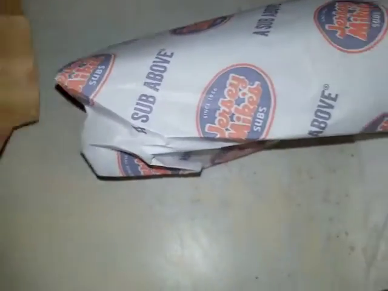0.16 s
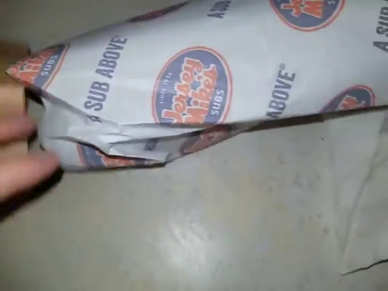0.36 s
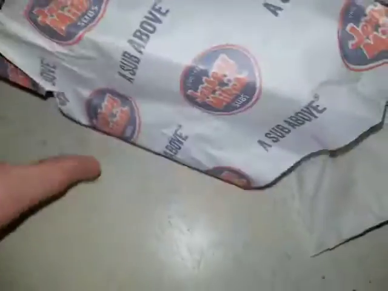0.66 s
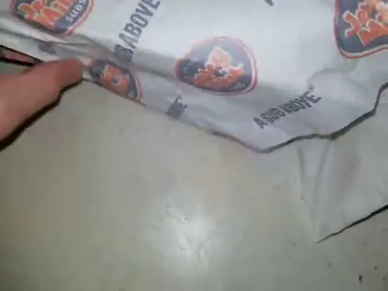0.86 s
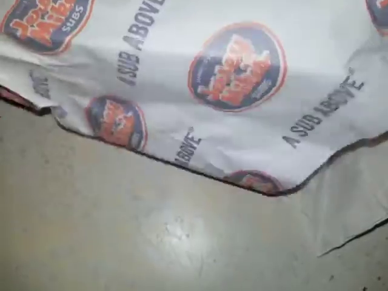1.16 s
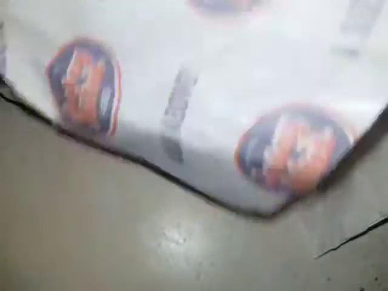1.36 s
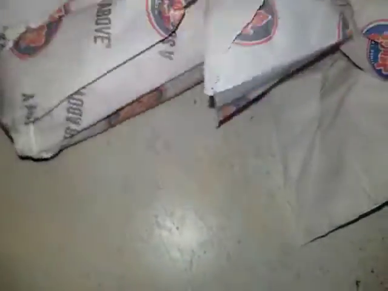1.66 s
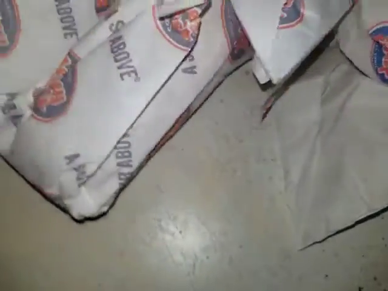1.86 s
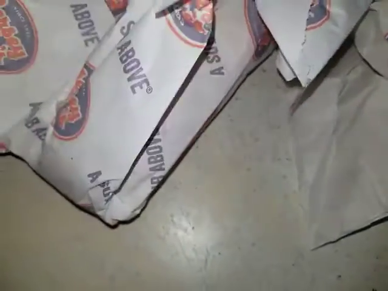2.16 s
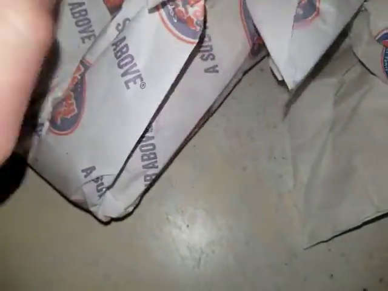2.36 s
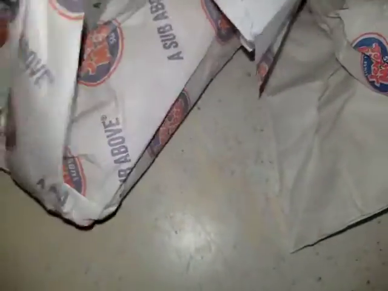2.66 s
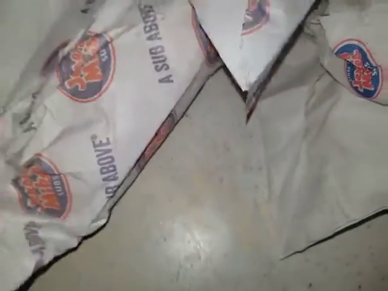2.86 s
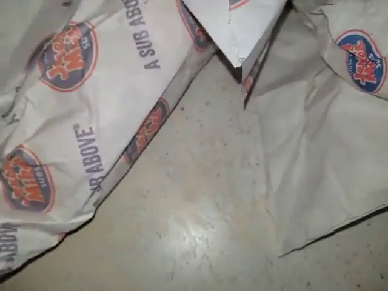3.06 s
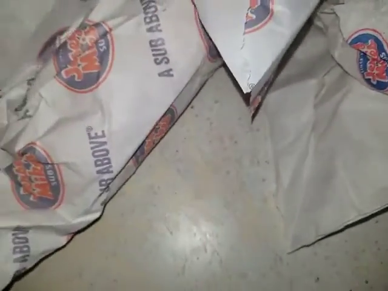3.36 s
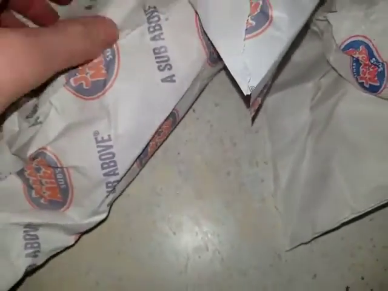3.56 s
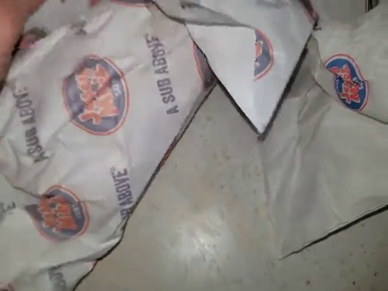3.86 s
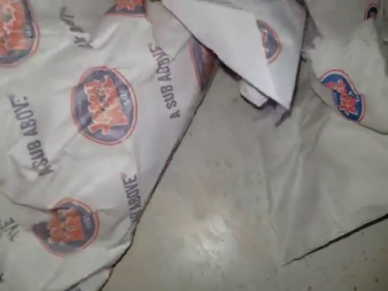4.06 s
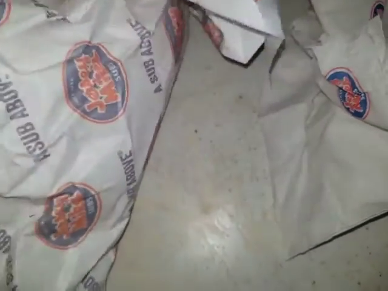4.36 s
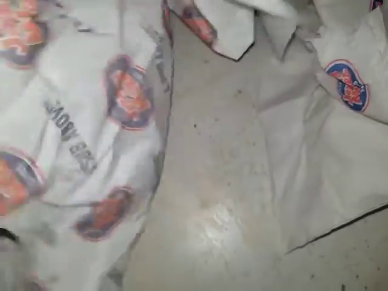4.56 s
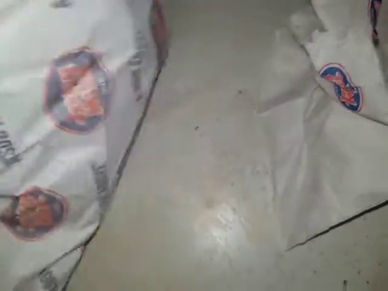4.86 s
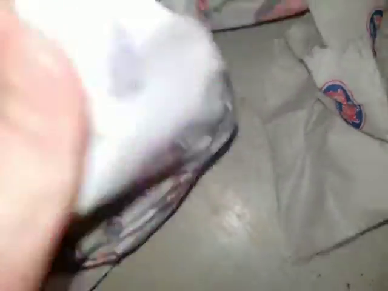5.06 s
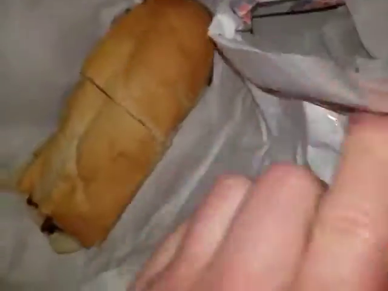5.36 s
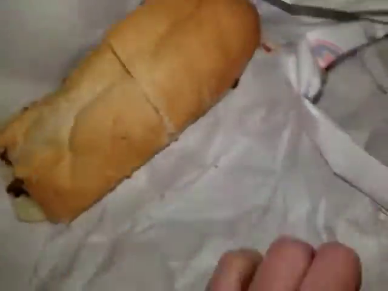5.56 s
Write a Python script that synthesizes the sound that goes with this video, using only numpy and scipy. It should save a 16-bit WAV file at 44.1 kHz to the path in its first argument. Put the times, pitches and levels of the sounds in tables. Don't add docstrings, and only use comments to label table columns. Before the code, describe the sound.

Stiff wrapping paper crinkles continuously but unevenly. It begins with separate rustles and strong snaps, thickens into rapid bright ticking and rasping swells, then opens with longer slides and calms before one last crackle. Dull table pushes and hollow paper knocks come between. Very close, wide stereo, little echo, with treble briefly dulling beside peaks, like a small handheld recorder.

```python
import sys
import numpy as np
from scipy import signal
from scipy.fft import rfft, irfft
from scipy.io import wavfile
from scipy.ndimage import minimum_filter1d

SR = 44100
rng = np.random.default_rng(int(sys.argv[2]) if len(sys.argv) > 2 else 0)


def store_wav(level_fs):
    pcm = np.round(np.clip(np.atleast_2d(level_fs), -1, 1) * 32767)
    wavfile.write(sys.argv[1], SR, pcm.T.astype(np.int16))


def gain_from_decibels(decibels):
    exponent = np.asarray(decibels, float) / 20
    return 10 ** exponent


N = 251811

BANDS_HZ = 32 * 2 ** np.arange(0, 9.1, .5)
CENTRES_HZ = np.sqrt(BANDS_HZ[1:] * BANDS_HZ[:-1])[:, None]
STEP = 8
T = np.arange(N // STEP + 1) * STEP / SR
SECONDS = np.arange(N) / SR
BOOM_DB = 10

# (time [s], level change [dB])
DIPS = [(.762, 1), (1.233, -22), (1.343, -10), (1.422, 4), (1.576, -5), (1.837, -3), (1.892, -17),
        (1.949, -6), (2.021, -24), (2.205, -11), (2.46, -19), (2.628, -3), (2.739, -5), (2.834, -13),
        (2.9, -6), (2.918, -7), (2.956, -10), (3.047, -30), (3.068, -56), (3.391, -14), (3.411, -9),
        (3.689, 6), (3.753, -14), (3.838, -14), (3.868, -12), (3.9, -4), (3.934, 4), (4.329, -24),
        (4.518, -34), (4.571, -7), (4.902, -13), (5.154, -7), (5.287, -9), (5.443, -12), (5.648, -10),
        (5.668, -23)]


def at_hz(points, hz):
    point_hz, value = np.transpose(points)
    return np.interp(np.log(hz), np.log(point_hz), value)


def below(corner_hz):
    return 1 / (1 + (CENTRES_HZ / corner_hz) ** 4)


def band(k, x):
    sos = signal.butter(2, BANDS_HZ[k:k + 2], "band", fs=SR, output="sos")
    return signal.sosfilt(sos, x)


def around(s, before, after):
    middle = round(s * SR / STEP)
    near = slice(max(middle - before, 0), middle + after)
    return near, 1000 * (T[near] - s)


def drift(rate_hz):
    r = np.exp(-2 * np.pi * rate_hz * STEP / SR)
    white = rng.standard_normal(len(T) + 4000)
    slow = signal.lfilter([1], [1, -2 * r, r * r], white)[4000:]
    return slow / slow.std()


def slips(gain_db, scatter_db):
    # (time [s], level [dB])
    effort = [(0, -49), (.27, -54.5), (.48, -35), (.76, -56), (.96, -37.5), (1.11, -52.5), (1.3, -42),
              (1.9, -46.5), (2.56, -50), (3.1, -40), (3.53, -56.5), (3.84, -46), (4.06, -40.5), (4.32, -47),
              (4.64, -39), (4.96, -41), (5.1, -49.5), (5.44, -52.5)]
    # (time [s], peak [dB], rise [ms], fall [ms], boom [dB])
    roll_out = [(.024, -29, 7.8, 12.3, -4.5), (.052, -38, 5.1, 21, 0), (.115, -31, 2.5, 6.4, -4.5),
                (.329, -29, 2.7, 8.3, -11), (.367, -44, 5.3, 97, 2), (.45, -29, 23.5, 5.9, -5.5),
                (.65, -43, 150, 6.2, -23), (.745, -45, 28, 39, -22.5), (.774, -32.5, 7.8, 6.6, -12),
                (.88, -33, 0.98, 7.1, -15), (.902, -31, 3.1, 16, -14), (1.011, -36, 26, 12, -20),
                (1.179, -37.5, 24.5, 40, -10.5), (1.247, -32.5, 3.9, 16, -8), (1.337, -28, 6.8, 7.1, -7.5),
                (1.362, -36, 4.9, 14, -8), (1.415, -31, 5.7, 2.9, -10), (1.447, -23.5, 3.3, 3.4, -15.5),
                (1.556, -67, 3.8, 4.1, -28), (1.5955, -27, 1.8, 2.6, -27.5), (1.685, -35, 56, 33, -9.5)]
    pick_at_fold = [(1.796, -23.5, 14, 3.7, -10.5), (1.84, -27, 6.6, 2.1, -14),
                    (1.959, -31.5, 10.6, 10.4, -14), (2.031, -29.5, 27.5, 7.5, -12),
                    (2.118, -33.5, 47, 11, -6.5), (2.16, -29.5, 9.3, 4.7, -12.5),
                    (2.211, -32.5, 5.1, 2.6, -13), (2.249, -40.5, 17, 12.5, -1), (2.321, -33, 17, 18, -14),
                    (2.365, -31.5, 12, 8.8, -14), (2.398, -35.5, 5.5, 6.4, -9),
                    (2.495, -23.5, 11.8, 4.1, -12.5), (2.653, -28.5, 10, 9.1, -14.5),
                    (2.704, -32.5, 19, 24, -12), (2.801, -28.5, 10, 11.2, -16),
                    (2.847, -34, 4.5, 3.5, -8.5), (3, -36, 9.3, 44, -5), (3.092, -25, 2.4, 2.8, -20.5),
                    (3.196, -29.5, 11.5, 9.3, -12), (3.242, -35.5, 14, 5.3, -15),
                    (3.316, -32, 2.6, 6.9, -13), (3.399, -35, 25, 11, -11.5),
                    (3.424, -32.5, 7.3, 7.1, -12.5), (3.44, -41.5, 3.7, 26, -8.5)]
    pull_open = [(3.575, -43, 9, 17, -4.5), (3.614, -34, 3.2, 3.8, -7), (3.64, -39.5, 12, 17, -11.5),
                 (3.778, -29.5, 12, 7.1, -11.5), (3.852, -38.5, 19, 2.9, -10.5),
                 (3.914, -30, 3.4, 8.3, -10.5), (4.053, -53, 16, 3.4, 6), (4.207, -31.5, 5.9, 3.1, -4.5),
                 (4.345, -38, 6.7, 63, -13.5), (4.445, -29.5, 5, 1.1, -9), (4.529, -29.5, 13.5, 25, -13.5),
                 (4.659, -27, 12, 26, -14), (4.788, -26, 10.3, 20, -16), (4.919, -32, 5.6, 9.5, -15),
                 (5.015, -39.5, 6.4, 19, -15), (5.409, -46.5, 6, 3, -12), (5.63, -41, 35, 120, -12.5),
                 (5.466, -47, 3.3, 5, -4), (5.561, -37.5, 42, 17, -9), (5.658, -30, 7.7, 7.5, -14)]
    low, top = below(1250.0), 1 - below(5000.0)

    s, effort_db = np.transpose(effort)
    rustle_db = np.interp(T, s, effort_db)
    rustle_boom_db = rustle_db + 45.0 - 53.5
    gentle_db = 0.082 * (rustle_db + 49.5)
    power = gain_from_decibels(low * (rustle_boom_db + BOOM_DB) + (1 - low) * rustle_db + top * gentle_db) ** 2

    rows = roll_out + pick_at_fold + pull_open
    chance = rng.standard_normal((len(rows), len(low), 1))
    for (s, db, rise_ms, fall_ms, boom_db), luck in zip(rows, chance):
        near, ms = around(s, 400, 400)
        bright_db = -2.5 - 0.81 * (boom_db + 12.5)
        colour_db = low * (boom_db + BOOM_DB) + top * bright_db
        reach = np.where(ms < 0, (ms / rise_ms) ** 4, (ms / fall_ms) ** 2)
        power[:, near] += gain_from_decibels(db + gain_db + colour_db + scatter_db * luck) ** 2 * np.exp(-.5 * reach)
    return power


def grain(per_s, size_db, clump_db, grain_ms, smooth, spread_octaves):
    clumps = gain_from_decibels(clump_db * drift(36.0))
    born = rng.random(len(T)) < per_s * clumps * STEP / SR
    size = born * gain_from_decibels(2 * size_db * np.minimum(rng.exponential(1, len(T)), 3.))
    pitch = rng.uniform(7.41, 17.81, len(T))
    distance = (np.log2(CENTRES_HZ) - pitch) / spread_octaves
    kicks = size * (0.082 + np.exp(-distance ** 2))
    fade = np.exp(-1000 * STEP / (grain_ms * SR))
    grains = signal.lfilter([1], [1, -fade], kicks)
    grains = grains / grains.mean(axis=1)[:, None]
    return (1 - smooth) * grains + smooth * clumps / clumps.mean()


def creases():
    # (time [s], peak [dB], brightest pitch [Hz], boom [dB])
    roll_out = [(0.1122, -19, 2220, -10), (.3311, -15.5, 7100, -55), (0.3606, -20, 3550, -32),
                (.4635, -15.5, 5860, -46), (.49, -44, 5000, -25.5), (.533, -32, 1550, 4),
                (.5719, -24.5, 924, -5), (.625, -40, 1080, 7.5), (0.6526, -22, 7000, -23),
                (0.7678, -7.5, 4630, -24), (0.8779, -32.5, 5450, 10.5), (.8978, -21, 1460, -8),
                (1.186, -28, 2880, -37), (1.2433, -10, 2290, -20), (1.2952, -16, 4830, -8),
                (1.3187, -10.5, 2800, -25), (1.3322, -21, 6600, -14), (1.3372, -18, 2750, -11),
                (1.3602, -13, 4100, -34), (1.3649, -18, 7300, -33), (1.3965, -23, 4050, -31),
                (1.4114, -12.5, 3920, -22), (1.4265, -22, 3650, -30), (1.4482, -10.5, 6400, -37),
                (1.518, -26, 4200, -10.5), (1.5511, -13.5, 2930, -18), (1.5595, -33, 4130, -36),
                (1.5955, -16.5, 5060, -22), (1.729, -25, 3140, -8)]
    pick_loose = [(1.7981, -8.5, 7500, -30), (1.8458, -12.5, 7950, -42), (1.866, -21.5, 6500, -9.5),
                  (1.908, -18.5, 2900, -39), (1.955, -18, 6000, -37), (1.963, -9.5, 6060, -45),
                  (2.011, -36.5, 2800, 5), (2.0345, -12, 6550, -46), (2.0496, -18, 7060, -18),
                  (2.1543, -17, 6800, -19), (2.471, -18, 6060, -29), (2.491, -8, 6440, -15),
                  (2.7496, -14.5, 7300, -10), (2.78, -23, 7150, -22), (2.8006, -35, 4400, -14),
                  (2.8516, -17, 7100, -30), (2.877, -23.5, 6980, -48), (2.908, -23.5, 2510, -11.5),
                  (2.9464, -16.5, 7600, -14), (2.964, -20.5, 5850, -11), (3.0035, -18, 4760, -25),
                  (3.06, -15.5, 8500, -8.5), (3.074, -20, 5350, -26), (3.0908, -22, 5430, -35),
                  (3.1881, -16.5, 7490, -23), (3.1998, -18, 4700, -32), (3.2352, -17, 1390, -13.5),
                  (3.245, -18, 7000, -14), (3.306, -25, 4050, -5), (3.4014, -27, 2020, -32),
                  (3.4193, -21, 3340, -25)]
    pull_open = [(3.698, -20, 7000, -40), (3.7038, -13, 7800, -48), (3.758, -34, 4390, -15),
                 (3.774, -20.5, 2300, -28), (3.854, -16.5, 6900, -19), (3.919, -16, 7000, -40),
                 (4.0216, -18, 1555, -29), (4.036, -18, 4500, -10), (4.053, -23, 4570, -28),
                 (4.157, -21, 5640, -44), (4.171, -27, 6200, -20), (4.21, -26, 7000, -19),
                 (4.258, -28.5, 6340, -13), (4.447, -25, 6600, -35), (4.4752, -21.5, 7150, -41),
                 (4.5218, -13, 2710, -21), (4.5838, -15, 6700, -30), (4.63, -17.5, 6800, -12),
                 (4.6657, -15.5, 5270, -17), (4.673, -21, 4760, -12), (4.783, -25, 8100, -14),
                 (4.9122, -19.5, 7400, -30), (4.974, -12, 4930, -18), (5.162, -31, 2460, -34),
                 (5.298, -21, 6160, -15), (5.458, -31.5, 6400, -10.5), (5.4657, -27, 4600, -19),
                 (5.5798, -22, 3220, -21), (5.6596, -29, 7400, -41), (5.689, -17.5, 5170, -15.5)]
    # (time [s], peak [dB], brightest pitch [Hz], boom [dB])
    small_ticks = [(0.0174, -23, 2080, -4), (0.3273, -11, 2020, -23), (0.422, -18, 2400, -20),
                   (0.447, -18, 1970, -20), (0.4535, -11.5, 7010, -24), (0.7751, -19.5, 2480, -4.5),
                   (0.9043, -14, 2840, -28), (0.966, -25, 4030, -28), (0.9876, -15, 6610, -29),
                   (1.0048, -20, 2300, 2), (1.157, -40, 2230, -20), (1.204, -27, 3040, -20),
                   (1.228, -16, 2070, -25), (1.6802, -16.5, 2290, -9), (1.7897, -15, 6600, -24),
                   (1.831, -23, 2660, -4.5), (2.0852, -22, 2450, -20), (2.0954, -13.5, 2980, -17),
                   (2.1146, -18, 1630, -14), (2.213, -25, 3150, -11), (2.2358, -37, 1340, -20),
                   (2.26, -27, 1930, -19), (2.297, -29, 2930, -14), (2.3107, -24, 2400, -22),
                   (2.3491, -28, 6990, -22), (2.365, -16.5, 1730, -32), (2.4402, -26, 3740, 0.5),
                   (2.592, -34, 2780, -10), (2.599, -30, 4050, -8), (2.638, -15.5, 7200, -19),
                   (2.687, -19, 2670, -27), (2.8147, -18, 1880, -25), (2.844, -15, 4550, -20),
                   (2.937, -18.5, 7000, -22),
                   (3.121, -23, 1890, -17), (3.1625, -21.5, 2330, -5.5), (3.3161, -14.5, 2190, -8),
                  (3.3728, -24, 2280, -20), (3.5748, -49, 1230, -20), (3.6134, -42, 1000, -20),
                  (3.6343, -27, 2320, -9), (3.9133, -11, 7070, -27), (3.9474, -30, 3070, -18),
                  (3.9833, -37, 4500, -20), (3.999, -22, 3730, -12), (4.0504, -24, 4700, -20),
                  (4.0761, -23, 5940, -16), (4.0838, -22.5, 2640, -5), (4.1135, -36, 6500, -23),
                  (4.205, -24, 2300, -15), (4.2333, -25.5, 4670, -20), (4.298, -28, 2400, -5),
                  (4.34, -19, 7050, -10.5), (4.399, -20.5, 1980, -11), (4.4434, -12, 3300, -15),
                  (4.5025, -24, 2700, -12), (4.5412, -15, 1900, -24), (4.6534, -15, 6230, -25),
                  (4.71, -17, 3990, -20), (4.777, -17, 4250, -20), (4.7945, -22, 1600, -25),
                  (4.7984, -16, 2070, -27), (5.015, -28, 2000, -4), (5.0374, -28, 2200, -20),
                  (5.2627, -34, 2140, -6), (5.4054, -31.5, 1090, -4), (5.613, -22.5, 3430, -21),
                  (5.6577, -7, 1550, -18)]
    # (time [s], peak [dB], brightest pitch [Hz])
    faint_ticks = [(.2962, -52, 2040), (0.546, -32, 3530), (0.5973, -33, 4400), (0.936, -41, 2460),
                   (1.1074, -46, 2300), (1.274, -34, 2850), (1.3925, -35, 3730), (2.0564, -30.5, 2190),
                   (2.1448, -35, 1890), (2.3864, -33.5, 4180), (2.399, -35.5, 3870), (2.466, -35, 6900),
                   (2.716, -31, 3200), (2.7366, -29, 3950), (3.1, -30.5, 1940), (3.141, -32, 1910),
                   (3.34, -37, 1830), (3.3933, -35, 2240), (3.65, -40, 1780), (4.2287, -38, 4700),
                   (4.356, -34, 6800), (4.374, -38, 1960), (4.569, -30, 2470), (4.635, -29, 5040),
                   (4.7895, -21.5, 4300), (5.064, -43, 2060), (5.1966, -43, 1730), (5.565, -36, 4350)]
    ticks = [(s + 0.00107, db - 5.5, hz, boom_db) for s, db, hz, boom_db in small_ticks]
    faint = [(s, db + 8, hz, -22) for s, db, hz in faint_ticks]
    return roll_out + pick_loose + pull_open + ticks + faint


def snaps(gain_db, spot_db, spot_octaves, scatter_db):
    rows = creases()
    power = np.zeros((len(CENTRES_HZ), len(T)))
    chance = rng.standard_normal((len(rows), len(CENTRES_HZ), 1))
    low, top, highest = below(2330.0), 1 - below(7300.0), 1 - below(18000.0)
    for (s, db, hz, boom_db), luck in zip(rows, chance):
        width = 2 ** ((boom_db + 20.5) / 68 - (db + 26.0) / 26.5)
        rise_ms, fall_ms = max(.15 * width, .1), max(1.32 * width, .1)
        near, ms = around(s, 60, 200)
        shape = np.exp(np.where(ms < 0, ms / rise_ms, -ms / fall_ms))
        colour_db = spot_db * np.exp(-(np.log2(CENTRES_HZ / hz) / spot_octaves) ** 2) + 0.62 * highest
        colour_db = colour_db + 0.23 * (db + 15.0) * top
        colour_db = colour_db + low * (boom_db + BOOM_DB)
        power[:, near] += gain_from_decibels(db + gain_db + colour_db + scatter_db * luck) ** 2 * shape
    return power * (1 - below(400.0))


def rings(gain_db, cycles, knock_cycles, crack_db, crack_cycles, crack_ratio):
    # (time [s], peak [dB], pitch [Hz])
    knocks = [(.024, -15.5, 825), (.06, -27, 430), (.028, -20, 2000), (.056, -29, 2100), (0.397, -29, 290),
              (0.446, -25, 266), (0.529, -35, 424), (0.946, -35, 330), (1.34, -18.5, 760), (1.85, -43, 139),
              (2.11, -41, 194), (2.488, -25, 290), (3.206, -29, 185), (0.967, -32, 443),
              (2.437, -34.5, 138), (2.603, -36, 229), (4.258, -37, 250), (4.826, -37, 270),
              (3.78, -29, 320), (4.204, -37, 250), (4.665, -28, 251), (4.852, -27, 453), (5.197, -31, 970),
              (5.499, -29, 870), (5.534, -28.5, 560), (5.571, -32.5, 740)]
    rows = creases()
    struck = [(s, db + gain_db, hz, cycles) for s, db, hz, boom_db in rows]
    cracked = [(s, db + crack_db, hz * crack_ratio, crack_cycles) for s, db, hz, boom_db in rows]
    knocked = [(s, db, hz, knock_cycles) for s, db, hz in knocks]
    out, t = np.zeros(N + 2048), np.arange(2048) / SR
    for s, db, hz, turns in struck + cracked + knocked:
        i = round(s * SR)
        swell = (1 - np.exp(-t * hz / 0.31)) * np.exp(-t * hz / turns)
        out[i:i + len(t)] += gain_from_decibels(db) * swell * np.sin(2 * np.pi * hz * t)
    return out[:N]


def bumps(gain_db, swell_ms, corner_hz):
    # (time [s], peak [dB])
    contacts = [(0.095, -46), (.17, -38), (0.428, -37), (.49, -46), (.94, -44), (1.313, -36.5),
                (1.826, -42), (1.97, -58), (2.08, -38), (2.4, -43), (2.47, -34.5), (2.584, -45),
                (3.171, -40), (3.9, -50), (4.64, -39), (4.769, -32), (5.252, -46.5), (5.62, -41.5),
                (5.689, -40)]
    push = 0
    for s, db in contacts:
        age = np.maximum(T - s, 0) * 1000 / swell_ms
        push = push + gain_from_decibels(db + gain_db) ** 2 * age * np.exp(1 - age)
    return below(corner_hz) ** 2 * push


def sheet(power):
    # (frequency [Hz], level [dB])
    radiation = [(50, -7), (120, 0), (260, 1), (600, -1.5), (15000, -1)]
    # (frequency [Hz], share [0-1])
    likeness = [(60, 0.45), (300, 0.99), (700, 0.43), (1500, 0.61), (2500, 0.48), (4000, 0.0071)]
    white, out = rng.standard_normal((2, 3, N)), 0
    for k, (hz,) in enumerate(CENTRES_HZ):
        alike = np.clip(at_hz(likeness, hz), 0, 1)
        shared, own = white[k % 2, 0], white[k % 2, 1:]
        strength = np.interp(SECONDS, T, np.sqrt(power[k]) * gain_from_decibels(7 + at_hz(radiation, hz)))
        out = out + band(k, strength * (np.sqrt(alike) * shared + np.sqrt(1 - alike) * own))
    return out


def pushes(width_ms):
    # (time [s], peak [dB])
    shifts = [
        (1.849, -36),
        (1.968, -40),
        (2.126, -48),
        (2.595, -39),
        (3.016, -44),
        (3.194, -37),
        (4.29, -48),
        (4.791, -37),
    ]
    return sum(gain_from_decibels(db) * np.exp(-(1000 * (SECONDS - s) / width_ms) ** 2) for s, db in shifts)


def room(x):
    # (frequency [Hz], time [s])
    decay = [(100, 0.41), (500, 0.21), (2500, 0.18), (12000, 0.052)]
    t = np.arange(SR // 3) / SR
    white = rng.standard_normal((2, 2, len(t))) * (t > .004)
    tail = 0
    for k, hz in enumerate(CENTRES_HZ):
        tail = tail + band(k, white[k % 2]) * gain_from_decibels(-60 * t / at_hz(decay, hz))
    tail = tail / np.sqrt(np.sum(tail ** 2) / 2)
    return signal.fftconvolve(x, tail, axes=1)[:, :N]


def scene():
    # (time [s], left over right [dB])
    hand_place = [
        (0, 0.5),
        (2.2, 1.5),
        (2.8, 2),
        (4.2, 1.5),
        (5.1, -2),
        (5.7, 0),
    ]
    sliding = slips(gain_db=-1.95, scatter_db=1.5)
    crackle = grain(per_s=400., size_db=1.8, clump_db=1.9, grain_ms=1.2, smooth=.4, spread_octaves=.4)
    hiss = np.minimum(sliding, gain_from_decibels(-60.) ** 2)
    power = hiss + (sliding - hiss) * crackle
    power = power + snaps(gain_db=-6.0, spot_db=3.0, spot_octaves=0.41, scatter_db=4.0)
    power = power + bumps(gain_db=12.5, swell_ms=8.5, corner_hz=180.0)
    near = sheet(power) + pushes(width_ms=1.7)
    near = near + rings(gain_db=-8.0, cycles=7.6, knock_cycles=2.2,
                        crack_db=-2.5, crack_cycles=0.93, crack_ratio=1.7)
    near[1] = np.roll(near[1], 16)
    pan_db = np.interp(SECONDS, *np.transpose(hand_place))
    near = near * gain_from_decibels(np.array([pan_db / 2, -pan_db / 2]))
    return near + gain_from_decibels(-15) * room(near)


def causal(points):
    cepstrum = irfft(np.log(gain_from_decibels(at_hz(points, np.arange(1025) * SR / 2048 + 1))))
    cepstrum[1:1024] *= 2
    cepstrum[1025:] = 0
    return irfft(np.exp(rfft(cepstrum)))[:512]


def patches(x, share, reach_ms, from_hz):
    hz, s, tiles = signal.stft(x, SR, nperseg=256)
    treble = hz[:, None] > from_hz
    power = np.sum(np.abs(tiles) ** 2 * treble, axis=(0, 1))
    quiet = power < -minimum_filter1d(-power, 15) / 5
    odds = share * quiet * sum(np.exp(-(1000 * (s - dip) / reach_ms) ** 2) for dip, db in DIPS)
    lost = np.repeat(rng.random((17, len(s))) < odds, 8, axis=0)[:len(hz)] & treble
    lost[:, 1:] |= lost[:, :-1] & quiet[1:]
    return signal.istft(tiles * ~lost, SR, nperseg=256)[1][:, :N]


def hush(x, bass_share, dip_ms):
    dip_db = 0
    for s, db in DIPS:
        steepness = np.where(T < s, 2, 6)
        dip_db = dip_db + db * np.exp(-(2000 * (T - s) / dip_ms) ** steepness)
    bass_gain = np.interp(SECONDS, T, gain_from_decibels(bass_share * dip_db))
    treble_gain = np.interp(SECONDS, T, gain_from_decibels(dip_db))
    bass = signal.sosfiltfilt(signal.butter(2, 4500, fs=SR, output="sos"), x)
    return bass_gain * bass + treble_gain * (x - bass)


def low_pass(x):
    return signal.sosfilt(signal.butter(12, 17140, fs=SR, output="sos"), x)


def record(dry):
    # (frequency [Hz], level [dB])
    left_port = [(500, 0), (800, 2.5), (5000, 0.5), (7300, 1.5), (8500, -6.5), (10500, -7), (12000, -3.5),
                 (15500, -4)]
    right_port = [(500, -3.5), (1800, 3), (2650, -9), (3700, -1), (5400, -13.5), (7800, -12.5),
                  (9200, -3.5), (10300, -8.5), (12000, -3), (14000, -10.5), (15500, -1.5)]
    ports = signal.fftconvolve(dry, [causal(left_port), causal(right_port)], axes=1)[:, :N]
    cut = signal.sosfilt(signal.cheby2(14, 48, 16250, fs=SR, output="sos"), ports)
    holed = patches(cut, share=.27, reach_ms=12., from_hz=7500.)
    mix = hush(holed, bass_share=0.45, dip_ms=7.9)
    return low_pass(mix)


dry = scene()
out = record(dry)
store_wav(out)
```